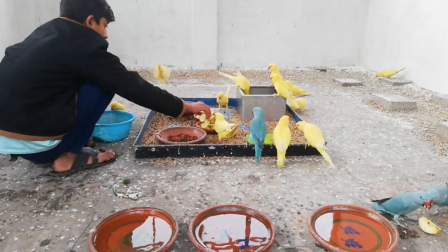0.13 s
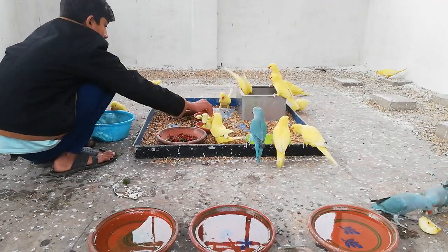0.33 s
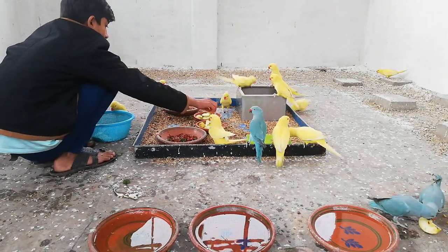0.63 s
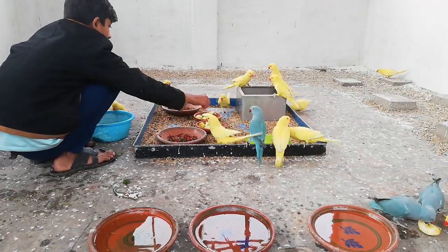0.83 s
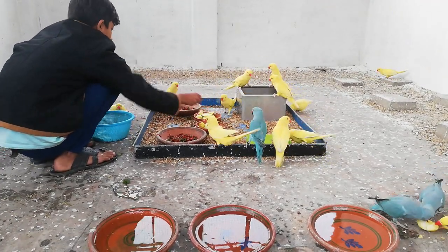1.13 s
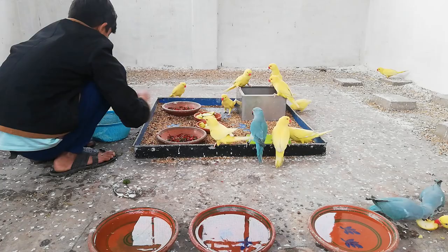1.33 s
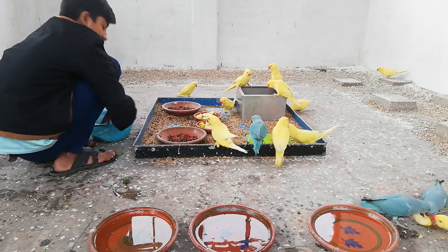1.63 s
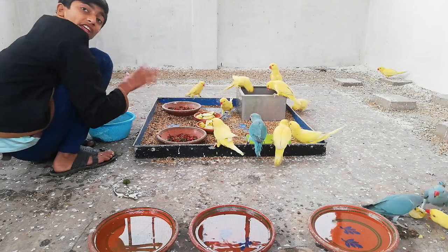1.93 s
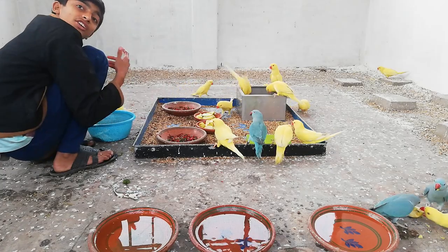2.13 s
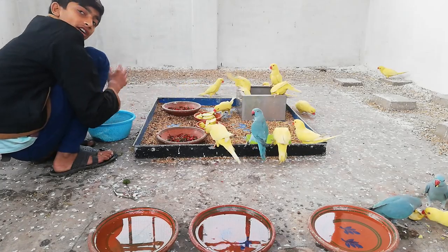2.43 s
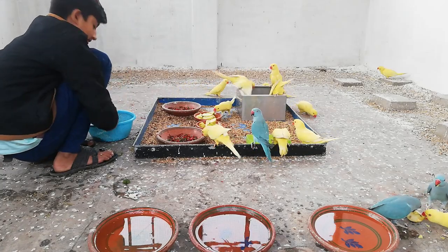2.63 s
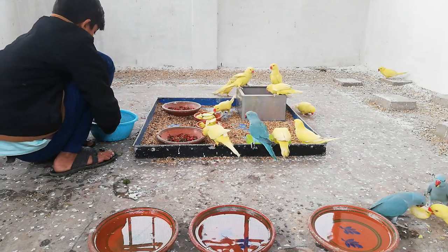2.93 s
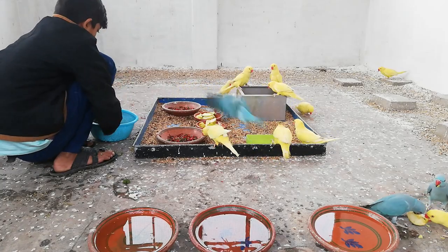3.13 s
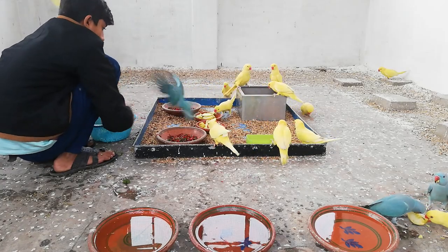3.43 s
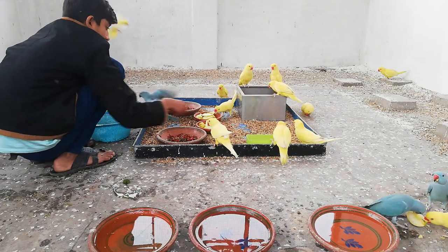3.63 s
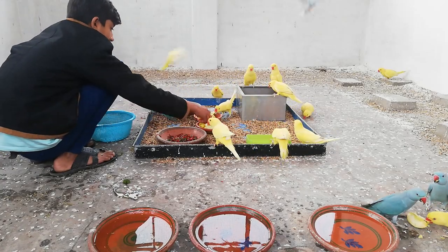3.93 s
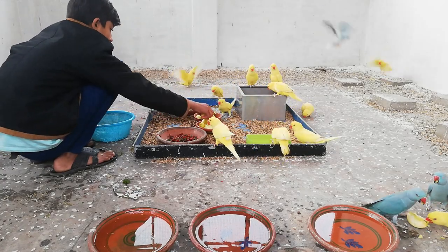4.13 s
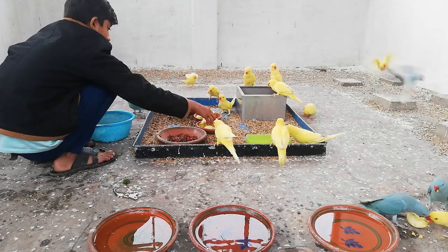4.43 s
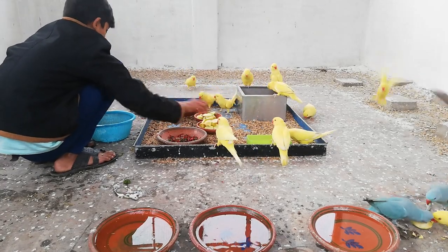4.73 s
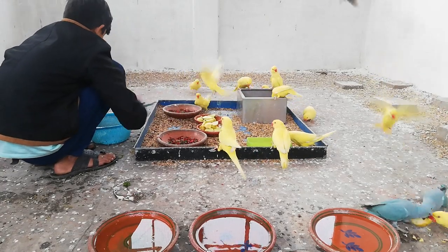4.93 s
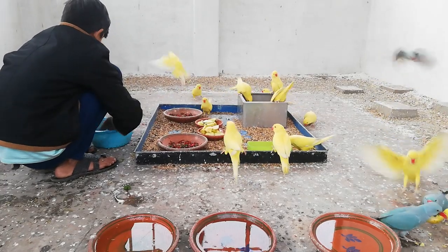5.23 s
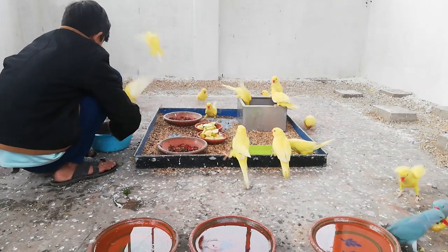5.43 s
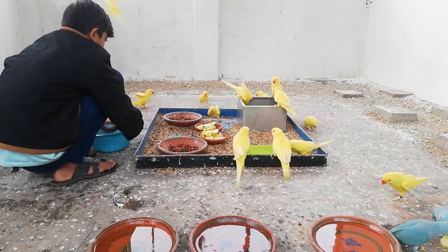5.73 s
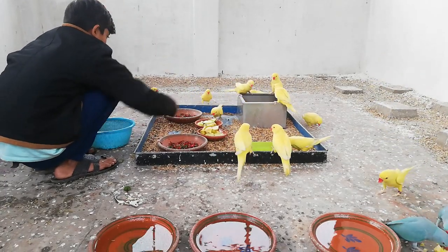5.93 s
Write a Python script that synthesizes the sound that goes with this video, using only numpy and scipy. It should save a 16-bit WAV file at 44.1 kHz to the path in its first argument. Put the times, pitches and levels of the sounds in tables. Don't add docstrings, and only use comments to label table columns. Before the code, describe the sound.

Four harsh falling parakeet screeches close by in a hard-walled aviary, then a hoarser distant answer over seed ticks, rustling husks and soft wing whisks.

```python
import sys
import numpy as np
from scipy import signal
from scipy.fft import rfft, irfft
from scipy.io import wavfile
from scipy.ndimage import uniform_filter1d

SR = 44100
rng = np.random.default_rng(int(sys.argv[2]) if len(sys.argv) > 2 else 0)


def generate_wav(signal):
    frames = np.transpose(np.atleast_2d(signal))
    scaled = np.clip(frames, -1, 1) * 32767
    pcm = np.round(scaled).astype(np.int16)
    wavfile.write(sys.argv[1], SR, pcm)


def how_loud(loudness_db):
    steps = np.asarray(loudness_db, float) / 20
    return 10 ** steps


N = 268480


def evened(x):
    return x / np.sqrt(np.mean(x ** 2) + 1e-20)


def read(points, hz):
    f, value = np.transpose(points)
    return np.interp(np.log(hz + 1), np.log(f + 1), value)


def unroll(rows):
    s, *columns = np.transpose(rows)
    t = np.arange(s[0], s[-1], 1 / SR)
    return [np.interp(t, s, c) for c in columns]


def add(mix, s, sound):
    part = mix[..., round(s * SR):][..., :sound.shape[-1]]
    part += sound[..., :part.shape[-1]]


def colour(x, points):
    hz = np.linspace(0, SR / 2, 257)
    return signal.oaconvolve(x, signal.firwin2(255, hz, how_loud(read(points, hz)), fs=SR), "same")


def wobble(length, hz):
    noise = rng.standard_normal(length + 2000)
    return evened(signal.lfilter(*signal.butter(2, hz, fs=SR), noise)[2000:])


def resonate(x, hz, width_hz):
    turn = np.exp(2j * np.pi * np.cumsum(hz * np.ones(len(x))) / SR)
    r = np.exp(-np.pi * width_hz / SR)
    return (turn * signal.lfilter([1], np.convolve([1, -r], [1, -r]), x / turn)).real


# f/Hz, t60/s
WALL_T60 = [(300, 0.66), (1500, 0.41), (3500, 0.43), (6000, 0.39), (10000, 0.29), (15000, 0.28)]
# t/s, level/dB
ECHOES = [
    (.003, 0),
    (.0055, -4),
    (.008, -3),
    (0.012, -7),
    (.021, 0),
    (.029, -10),
    (0.04, -10),
]


def room(x):
    taps = np.zeros((2, SR))
    at = np.arange(400, SR - 20, 20) + rng.integers(0, 20, (2, (SR - 401) // 20))
    np.put_along_axis(taps, at, rng.choice([-1., 1.], at.shape), 1)
    hz, t, z = signal.stft(taps, SR, nperseg=256)
    decay = how_loud(-60 * t / read(WALL_T60, hz)[:, None])
    tail = signal.istft(z * decay, SR, nperseg=256)[1]
    tail /= np.linalg.norm(tail[0])
    for s, db in ECHOES:
        delay = (s * SR * rng.uniform(.85, 1.15, 2)).astype(int)
        tail[[0, 1], delay] += how_loud(db - 6.5)
    return signal.fftconvolve(x, tail, axes=1)[:, :N]


# f/Hz, level/dB
TRAFFIC_DB = [(12, -30), (20, 2.5), (109, 0), (163, -8.5), (210, -7), (247, -13.5), (282, -10.5),
              (422, -19), (483, -20), (700, -25), (910, -24), (1540, -120)]
# t/s, level/dB
TRAFFIC_LEVEL = [(0, -41.5), (.28, -49.5), (.6, -47), (.87, -52), (1.049, -49.5), (1.43, -51),
                 (1.74, -48.5), (2.65, -49), (2.81, -47.5), (2.9, -50.5), (3.2, -49), (3.53, -46.5),
                 (4.18, -48), (4.7, -47.5), (5.07, -43), (5.55, -47), (5.9, -48.5), (6.088, -47)]
# f/Hz, side minus mid level/dB
SIDE_DB = [(60, -28), (110, -20), (200, -15.5), (380, -2), (700, 5.5), (1290, -1.5), (2380, 0), (4400, 0),
           (8120, 0), (15000, 0.5)]


def traffic():
    hz = np.fft.rfftfreq(N, 1 / SR)
    mid, side = rfft(rng.standard_normal((2, N))) * how_loud(read(TRAFFIC_DB, hz))
    side = side * how_loud(read(SIDE_DB, hz))
    level_db = np.interp(np.arange(N) / SR, *np.transpose(TRAFFIC_LEVEL))
    return how_loud(level_db) * evened(irfft(np.array([mid + side, mid - side]), N))


def humps(events, floor_db):
    s, peak_db, rise, fade = np.transpose(events)[:, :, None]
    t = np.arange(0, N + 64, 64) / SR
    db = peak_db - 22 * np.where(t < s, (s - t) / abs(rise), (t - s) / abs(fade))
    gain = np.sqrt(how_loud(floor_db) ** 2 + (how_loud(db) ** 2).sum(0))
    return np.interp(np.arange(N) / SR, t, gain)


def bed(spectrum, gain, flicker_db):
    patchy_db = 1.7
    frames, hz = N // 128 + 5, np.fft.rfftfreq(512, 1 / SR)
    a, b, c, d, patches = rng.standard_normal((frames, 257, 5)).T
    patches = evened(uniform_filter1d(uniform_filter1d(patches, 8, 0), 20, 1))
    flicker = evened(uniform_filter1d(rng.standard_normal(frames), 3))
    mid = a + 1j * b
    side = how_loud(read(SIDE_DB, hz))[:, None] * (c + 1j * d)
    z = np.array([mid + side, mid - side])
    z *= how_loud(read(spectrum, hz)[:, None] + patchy_db * patches + flicker_db * flicker)
    return gain * evened(signal.istft(z, nperseg=512, noverlap=384)[1][:, :N])


# f/Hz, level/dB per Hz
WASH_DB = [(240, -34), (400, -6), (861, -4), (947, 0.5), (1660, -1.5), (3140, -7.5), (5580, -8.5),
           (7000, -13.5), (9100, -43), (15400, -120)]
# t/s, peak level/dB, rise/s, fade/s
WHISKS = [(0, -49, .01, 0.67), (.418, -57, 0.1, 0.53), (.94, -55, 0.09, 0.73), (1.08, -58, 0.042, 0.99),
          (1.38, -47.5, 0.0017, 0.2), (1.74, -44, 0.18, 1), (2.36, -41, 0.19, 0.26),
          (2.65, -47.5, 0.25, 0.23), (2.81, -44.5, 0.0076, 0.28), (2.95, -53.5, 0.41, 1),
          (3.4, -53.5, 0.078, 0.12), (3.67, -50, 0.016, 0.5), (4.12, -55.5, 0.85, 0.27),
          (4.36, -52.5, 0.52, 0.5), (4.69, -55.5, 0.11, 0.19), (4.85, -57.5, 0.25, 0.88),
          (5.2, -52.5, 0.46, 0.74), (5.69, -58.5, 0.13, 0.98), (5.806, -55, 0.47, 0.46),
          (6.088, -53, 0.11, .1)]


def wings():
    return bed(WASH_DB, humps(WHISKS, floor_db=-63), flicker_db=0.97)


# f/Hz, level/dB per Hz
RUSTLE_DB = [(2350, -11.5), (4000, -5), (4870, -2), (5700, -9.5), (9660, -4), (13300, -12), (15100, -8),
             (16000, -29)]
# t/s, peak level/dB, rise/s, fade/s
STIRS = [(0, -53, .01, 1), (.418, -50, 0.021, 0.12), (.576, -53, 0.15, 0.043), (.94, -58.5, 0.073, 0.36),
         (1.256, -55, 0.96, 0.2), (2.05, -80, .8, .8), (2.65, -55, 0.44, 0.46), (3.19, -57.5, 0.56, 0.92),
         (3.53, -55.5, 0.84, 0.96), (3.655, -42, 0.014, 0.2), (4.12, -52.5, 0.17, 0.12),
         (4.36, -56.5, 1, 1), (4.69, -58.5, 0.37, 0.26), (4.9, -52.5, 0.57, 1), (5.2, -52.5, 0.024, 1),
         (5.69, -52, 0.11, 0.31), (5.82, -59, 0.019, 0.98), (6.02, -46, 0.38, 0.14)]


def rustle():
    return bed(RUSTLE_DB, humps(STIRS, floor_db=-85), flicker_db=1.5)


# t/s, length/s, f/Hz, width/Hz, level/dB
HOOTS = [(0, .07, 1740, 110, -60), (.4, .085, 2800, 350, -63), (.4, .085, 3600, 400, -66),
         (.42, .146, 880, 530, -60.5), (.88, .5, 1690, 200, -67), (.89, .32, 4620, 300, -68),
         (.98, .45, 1137, 14, -64), (1.08, .08, 473, 36, -63), (1.2, .18, 460, 14, -67),
         (1.26, .13, 2440, 40, -68), (1.14, .04, 3100, 300, -66), (1.06, .04, 850, 200, -62),
         (2.294, .123, 373, 73, -58), (2.82, .16, 1220, 120, -56), (2.859, .143, 1470, 120, -52.5),
         (3.363, .265, 768, 49, -67.5), (3.46, .2, 6280, 250, -63.5), (3.999, .65, 217, 9, -59),
         (4.799, .11, 800, 660, -56.5), (4.855, .355, 289, 27, -57.5), (5.26, .34, 303, 67, -59),
         (5.6, .49, 208, 10, -62.5), (5.85, .2, 4300, 270, -63)]
# t/s, length/s, from f/Hz, to f/Hz, level/dB
CHIRPS = [
    (.871, .125, 2820, 3010, -68),
    (2.702, .2, 5100, 4600, -57),
    (2.84, .16, 2280, 1940, -64),
    (4.047, .333, 4170, 2900, -61.5),
    (4.377, .09, 624, 550, -61),
]


def far_calls():
    out = np.zeros((2, N))
    notes = [(s, length, hz, hz, width, db) for s, length, hz, width, db in HOOTS]
    notes += [(s, length, a, b, abs(a - b), db) for s, length, a, b, db in CHIRPS]
    for start, length, from_hz, to_hz, width, db in notes:
        noise = rng.standard_normal((2, int(.7 * SR)))[:, :int(length * SR)]
        glide_hz = np.linspace(from_hz, to_hz, noise.shape[1])
        whistle = evened(np.array([resonate(v, glide_hz, width) for v in noise]))
        level = how_loud(db + 6.0 + wobble(len(glide_hz), 19))
        add(out, start, level * whistle * signal.windows.tukey(len(glide_hz), .7))
    return out


# t/s, peak level/dB, f/Hz, scatter level/dB, left minus right level/dB
TICKS = [(0.0497, -44, 9940, -38, -7), (0.132, -38, 7860, -39, 0), (0.168, -33.5, 6500, -28, 3),
         (0.3225, -35.5, 5800, -24, -9), (0.404, -51, 9200, -4, -3), (0.52, -46, 10200, -24, -2),
         (0.556, -38.5, 9340, -19, -2), (1.063, -46, 9100, -3, -3), (1.1326, -37, 8900, -10.5, -4),
         (1.261, -30.5, 9200, -18.5, -8), (1.272, -40, 7900, -12, 9), (2.812, -36, 6000, -20, 7),
         (2.973, -45, 9950, -15, 8), (3.135, -48, 5800, -13, 4), (3.156, -41, 5900, -32, 0),
         (3.259, -44, 6300, -30, 0), (3.384, -36, 11600, -13.5, -10), (3.6467, -31, 8600, -27, -8),
         (3.7042, -30.5, 9000, -43, -9), (3.929, -47.5, 9650, -9.5, -2.5), (4.055, -46, 10000, -29, -2),
         (4.0902, -39.5, 9350, -33, -2), (4.155, -47, 12500, -30, -2), (4.996, -43, 9200, -41, -9),
         (5.195, -37.5, 6550, -31, -3), (5.2707, -15.5, 6560, -51, 5), (5.584, -47, 3700, -30, 0),
         (5.669, -44.5, 9660, -7, -2), (5.8152, -38.5, 8100, -4.5, 2), (5.911, -42.5, 8600, -2, -2),
         (6.012, -38, 8600, -5, -5)]


def ticks():
    out, t = np.zeros((2, N)), np.arange(6000) / SR
    knock = np.sin(2 * np.pi * 420 * t) * np.exp(-t / 0.0029)
    scatter_gain = np.exp(-t / 0.046) * (1 - np.exp(-t / 0.0038))
    for s, db, hz, scatter_db, pan_db in TICKS:
        burst, *husks = rng.standard_normal((3, 6000))
        snap = resonate(burst * np.exp(-t / .0005), hz, 5000)
        scatter = evened(np.array([resonate(v, hz, 4700) for v in husks])) * scatter_gain
        hit = snap / abs(snap).max() + how_loud(-15.5) * knock
        pan = how_loud([[pan_db / 2], [-pan_db / 2]])
        add(out, s, how_loud(db) * (hit * pan + how_loud(scatter_db) * scatter))
    return out


def stack(hz, partials_db, throat_db, jitter, flutter_hz):
    turns = np.cumsum(hz * (1 + jitter * wobble(len(hz), 307))) / SR
    tone = np.zeros(len(hz))
    for k, db in enumerate(partials_db, 1):
        flutter_db = (3 + 0.45 * k) * wobble(len(hz), flutter_hz)
        partial = np.cos(2 * np.pi * (k * turns + rng.random()))
        tone += how_loud(db + throat_db(k) + flutter_db) * (k * hz < 15000) * partial
    return tone / np.sqrt(uniform_filter1d(tone ** 2, 900, mode="reflect") + 1e-9), turns


# t/s, arching voice f/Hz, level voice f/Hz, effort level/dB
ANSWER = [(5.205, 1367, 1468, -55), (5.23, 1586, 1700, -43), (5.25, 1993, 1968, -35),
          (5.275, 2500, 2160, -35), (5.3, 2797, 2230, -30.5), (5.335, 2953, 2295, -28.5),
          (5.37, 2710, 2189, -33), (5.44, 2430, 1942, -36.5), (5.53, 2270, 1880, -63)]
# level/dB of partials 1, 2, ..
ARCH_PARTIALS_DB = [4, -7, -16]
# level/dB of partials 1, 2, ..
FLAT_PARTIALS_DB = [1, -8, -13.5, -24, -12.5]
# f/Hz, level/dB
FAR_THROAT = [(800, -55), (1400, 8.5), (2000, -3), (2850, 5), (3400, -1), (3900, 13), (4500, 8.5),
              (5200, 13), (6100, 4.5), (6700, 9), (9000, 4.5), (11000, -10), (15000, 0)]


def answer():
    arch_share, arch_late_share, handover_s = 0.64, 0.2, 5.35
    jitter = .022
    arch_hz, flat_hz, effort_db = unroll(ANSWER)
    n = len(arch_hz)
    arch = stack(arch_hz, ARCH_PARTIALS_DB, lambda k: 0, jitter, 220)[0]
    flat = stack(flat_hz, FLAT_PARTIALS_DB, lambda k: 0, jitter, 250)[0]
    late_s = ANSWER[0][0] + np.arange(n) / SR - handover_s
    share = arch_share + (arch_late_share - arch_share) * np.clip(late_s / 0.019 + .5, 0, 1)
    rasp = evened(resonate(rng.standard_normal(n), (arch_hz + flat_hz) / 2, 430))
    strand = evened(resonate(rng.standard_normal(n), np.maximum(2 * flat_hz, 4200), 210))
    voice = share * arch + (1 - share) * flat + 0.28 * arch * flat
    voice += 0.12 * rng.standard_normal(n) + 0.6 * rasp + 0.16 * strand
    level = how_loud(effort_db + 2.5 + 2 * wobble(n, 220))
    return ANSWER[0][0], level * colour(voice, FAR_THROAT) * signal.windows.tukey(n, .05)


# level/dB of partials 1, 2, ..
PARTIALS_DB = [-6.5, -4.5, -1.5, -6.5, -10, -11.5, -12.5, -17, -36, -21]
# f/Hz, level/dB
THROAT = [(700, -61), (1100, -14.5), (1800, -13), (2500, -7), (3400, 3), (4600, -4), (5600, -8),
          (6300, -3.5), (7500, -11), (9300, -1), (10800, -14), (11800, -19.5), (14000, -16.5), (14800, -80)]


def cry(pitch, efforts_db, thirds_db, firsts_db, brights_db, fifth_db, effort_strain):
    curves = np.column_stack([pitch, efforts_db, thirds_db, firsts_db, brights_db])
    hz, effort_db, third_db, first_db, bright_db = unroll(curves)
    n = len(hz)
    t = np.arange(n) / SR
    strain = np.interp(hz, (1900, 2500), [0, 1])
    rough = .05 + .17 * strain + .35 * np.exp(-t / .025)

    def throat_db(k):
        balance_db = (k == 1) * first_db + (k == 3) * third_db
        balance_db = balance_db + (k > 2) * bright_db + (k > 3) * (k % 2) * fifth_db
        return read(THROAT, k * hz) + balance_db

    tone, turns = stack(hz, PARTIALS_DB, throat_db, .006 + .012 * effort_strain * strain, 86)
    rasp = (1 + np.cos(2 * np.pi * turns)) * rng.standard_normal(n)
    second_turns = 1152 * np.cumsum(1 + 0.092 * wobble(n, 120)) / SR
    second = np.exp(-t / 0.0085) * np.cos(2 * np.pi * second_turns)
    voice = tone * (1 + second) + how_loud(-14.5) * second + rough * evened(colour(rasp, THROAT))
    return pitch[0][0], how_loud(effort_db) * voice * signal.windows.tukey(n, min(0.0016 * SR / n, 1))


# t/s, f/Hz
SCREECHES = [
    [(1.388, 1000), (1.404, 1550), (1.43, 2330), (1.45, 2530), (1.472, 2388), (1.504, 1990), (1.554, 1775),
     (1.6, 1590), (1.635, 1370)],
    [(1.747, 1200), (1.757, 1400), (1.762, 1750), (1.773, 2230), (1.79, 2680), (1.803, 2620), (1.839, 1938),
     (1.903, 1620), (1.938, 1350)],
    [(2.062, 1680), (2.077, 1900), (2.0865, 2900), (2.087, 2000), (2.107, 1800), (2.1075, 2570),
     (2.135, 1960), (2.185, 1710), (2.243, 1190)],
    [(2.38, 1720), (2.39, 1760), (2.402, 2850), (2.418, 2830), (2.428, 2280), (2.444, 1920), (2.49, 1565),
     (2.526, 1290), (2.555, 1080)],
]
EFFORT_DB = [
    [-47, -26, -17.5, -17.5, -15, -21, -15, -15.5, -22.5],
    [-22, -25.5, -14, -13.5, -14.5, -18, -18.5, -13, -17.5],
    [-21.5, -15.5, -3.5, -11, -14.5, -10.5, -13, -15, -18.5],
    [-34, -6, -13.5, -28, -8.5, -14, -15.5, -17.5, -21],
]
THIRD_DB = [
    [-9, -18, 0, -35, 0, -5.5, -11.5, -5, 9.5],
    [-6, -0.5, 0, -4, 4, -14, -6.5, -6, -0.5],
    [-12, -4, 10, -25, -27, -8, -8, -10, 5.5],
    [-8, -7, -15, -9, -9.5, -1, 0, 1, 2],
]
FIRST_DB = [
    [6, 5, 1, 0, -1, -3, -3, -2, -4],
    [0, 0, -2, -1, 0, -1, -4, -3, -6],
    [-5, -6, -9, -16, -12, -9, -9, -3, -8],
    [-3, -4, -5, -4, -9, -7, 0, -2, -8],
]
BRIGHT_DB = [
    [-6, -4, -2, -1, -2, -4, -3, -3, -6],
    [-9, -11, -11, -8, -6, -4, -6, -5, -8],
    [-8, -13, -16, -3, -3, -1, -3, -5, -6],
    [-6, -9, -13, -8, -4, -5, -6, -4, -6],
]
FIFTH_DB = [-2.5, -2, 0, 0.1]
STRAIN = [1, 1, .5, .35]
# t/s, level/dB, length/s
PUFFS = [
    (1.386, -45, 0.0063),
    (1.733, -35, 0.051),
    (2.048, -27, 0.046),
    (2.364, -28, 0.0084),
]


def near_bird():
    out = np.zeros(N)
    for row in zip(SCREECHES, EFFORT_DB, THIRD_DB, FIRST_DB, BRIGHT_DB, FIFTH_DB, STRAIN):
        add(out, *cry(*row))
    for s, db, length in PUFFS:
        puff = colour(rng.standard_normal(2000), THROAT)[:int(length * SR)]
        add(out, s, how_loud(db) * evened(puff))
    return signal.sosfilt(signal.butter(6, 1050, "high", fs=SR, output="sos"), out)


# f/Hz, level/dB
SHADOW = [(1000, -1), (4000, -3), (6000, -7), (10000, -10), (16000, -12)]


def direct_paths(near, far):
    port_lag, far_lag = 11, 20
    left = how_loud(2.2) * colour(np.roll(near, port_lag), SHADOW) + how_loud(-7.0) * far
    right = how_loud(5.5) * near + how_loud(-6.0) * np.roll(far, far_lag)
    return np.array([left, right])


def scene():
    background = traffic() + wings() + rustle() + far_calls()
    small = ticks()
    far = np.zeros(N)
    add(far, *answer())
    near = near_bird()
    wet = room(how_loud(.5) * near + how_loud(-12.5) * far + how_loud(-7.5) * small)
    return background + small + direct_paths(near, far) + wet


def top_cut(x):
    return signal.sosfilt(signal.butter(12, 16420, fs=SR, output="sos"), x)


# f/Hz, level/dB
LEFT_PORT = [(500, -3), (3000, 3), (5000, 0.5), (7500, 3.5), (9500, 1), (12000, -8), (15900, -4),
             (16400, -67)]
# f/Hz, level/dB
RIGHT_PORT = [(500, -3.5), (3000, 3), (5000, 0.5), (7500, 5.5), (9500, 10.5), (12000, 5.5), (15900, -2.5),
              (16400, -67)]
# f/Hz, level/dB
HISS = [(1000, -79), (2500, -18), (4000, -2), (9000, 8), (13000, 1), (15700, -13), (16300, -64)]


def record(dry):
    knee, ceiling, recovery_db_per_s = .7, .93, 28.6
    x = np.array([colour(dry[0], LEFT_PORT), colour(dry[1], RIGHT_PORT)])
    power_db = 10 * np.log10(abs(uniform_filter1d((x ** 2).mean(0), 300)) + 1e-12)
    fall_db = np.arange(N) * recovery_db_per_s / SR
    held_db = np.maximum.accumulate(power_db + fall_db) - fall_db
    over_db = np.maximum(held_db + 20.5, 0)
    ducked = x / how_loud(0.56 * uniform_filter1d(over_db, 200))
    spare = ceiling - knee
    bent = spare * np.tanh(np.maximum(abs(ducked) - knee, 0) / spare)
    limited = np.clip(ducked, -knee, knee) + np.sign(ducked) * bent
    limited = signal.sosfiltfilt(signal.butter(8, 16200, fs=SR, output="sos"), limited)
    hiss = evened(np.array([colour(v, HISS) for v in rng.standard_normal((2, N))]))
    return top_cut(limited + how_loud(-78) * hiss)


dry = scene()
out = record(dry)
generate_wav(out)
```